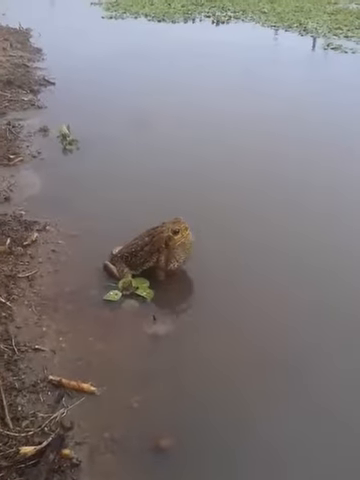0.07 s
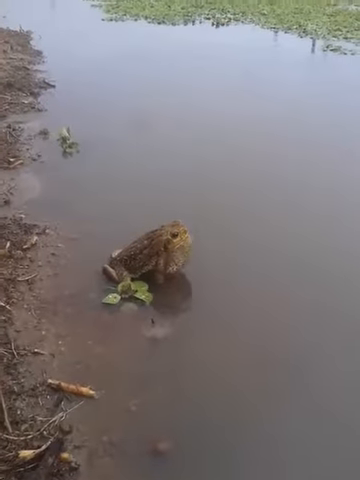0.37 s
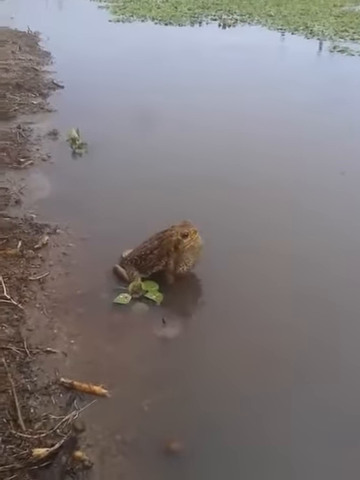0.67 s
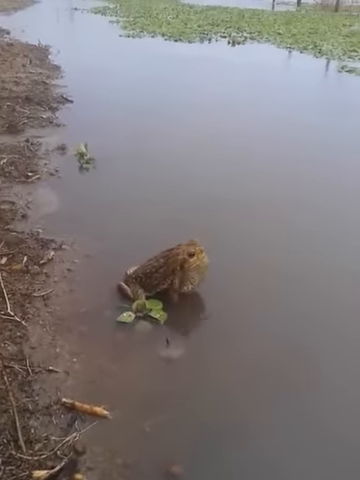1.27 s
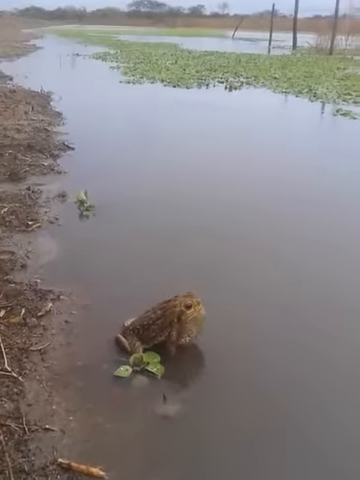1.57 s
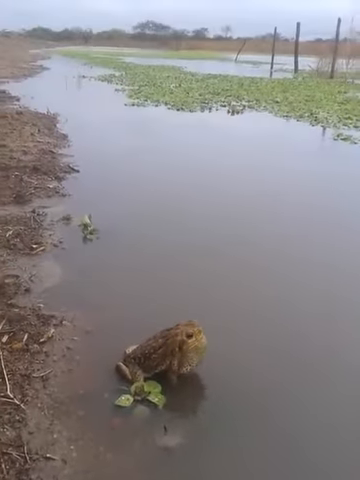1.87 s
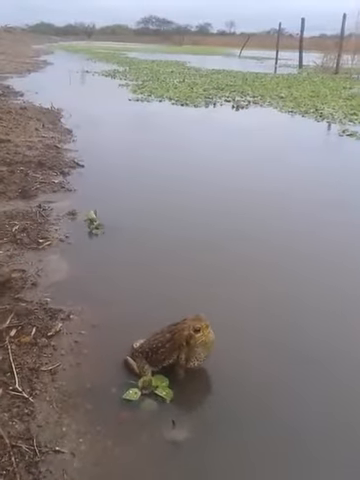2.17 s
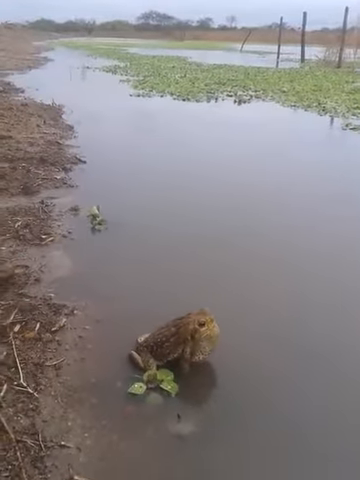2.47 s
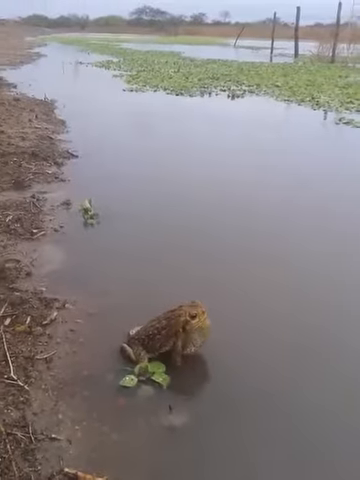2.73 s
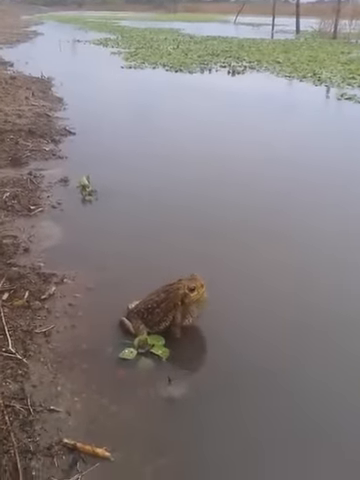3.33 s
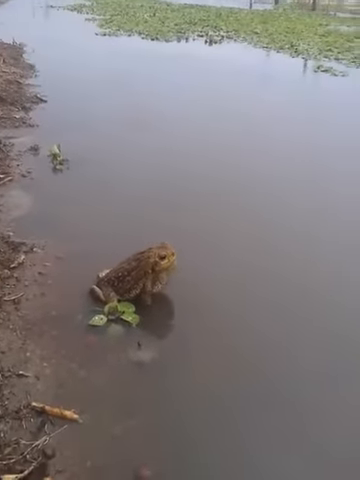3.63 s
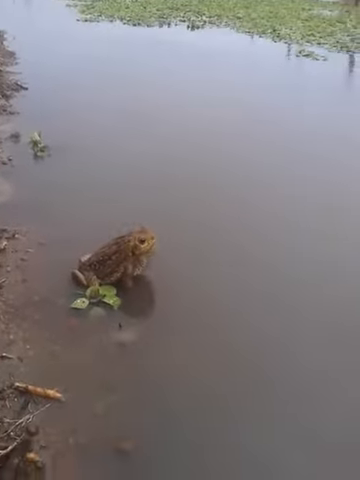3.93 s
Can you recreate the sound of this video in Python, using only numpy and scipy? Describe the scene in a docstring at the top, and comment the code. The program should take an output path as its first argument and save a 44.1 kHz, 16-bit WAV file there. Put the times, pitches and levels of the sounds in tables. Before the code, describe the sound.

At a pond's edge, a very close toad gives a low, rapidly pulsing, slightly distorted call. A quieter toad joins and carries on after it ends, with high frog trills, a few wet ticks and a distant chorus.

```python
"""A big toad at a pond's edge drums a low trill for three seconds, its vocal sac swelling several times
per pulse, so close that it overloads the microphone and rasps. A second toad answers farther off.
Two small frogs rattle high trills of chirped clicks, one fading early, one swelling at the end,
over a distant chorus, a thin insect tone and a few wet ticks."""
import sys
import numpy as np
from scipy import signal
from scipy.fft import rfft, irfft
from scipy.io import wavfile

SR = 44100
rng = np.random.default_rng(int(sys.argv[2]) if len(sys.argv) > 2 else 0)


def store_pcm(level_fs):
    """Save levels as 16-bit WAV."""
    pcm = np.round(np.clip(level_fs, -1, 1) * 32767).astype(np.int16)
    wavfile.write(sys.argv[1], SR, np.atleast_2d(pcm).T)


N = 176400
TIME_S = np.arange(N) / SR


def from_db(db):
    """Decibels to gain."""
    return 10 ** (np.asarray(db) / 20)


def unit_rms(x):
    """Scale to rms 1."""
    return x / np.sqrt(np.mean(x ** 2) + 1e-20)


def add(out, start_s, sound):
    """Mix a sound in at start_s."""
    i = int(round(start_s * SR))
    a, b = max(i, 0), min(i + len(sound), N)
    if b > a:
        out[a:b] += sound[a - i:b - i]


def ring(drive, hz, t60_s):
    """Resonator: a unit click starts a decaying sine of height 1."""
    r, w = from_db(-60 / (t60_s * SR)), 2 * np.pi * hz / SR
    return signal.lfilter([0, np.sin(w)], [1, -2 * r * np.cos(w), r * r], drive + 1e-18)


def bell(x, hz, db, q):
    """Lift or cut one band."""
    return x + (from_db(db) - 1) * signal.lfilter(*signal.iirpeak(hz, q, fs=SR), x)


def scatter(x, t60_s):
    """Diffuse reflections from banks and plants."""
    t = TIME_S[:SR // 2]
    tail = rng.standard_normal(len(t)) * from_db(-60 * t / t60_s)
    return signal.fftconvolve(x, tail / np.linalg.norm(tail))[:N]


def toad_pulse(at_s, hz, swells, lag_turns):
    """Sac tone sagging in pitch; each swell lags the last in phase. Returns start time and sound."""
    sag_hz, sag_at_s, sag_s = 32.8, .0228, .0018
    lift_hz, lift_s = 27.78, .0045
    t = np.arange(-.008, .08, 1 / SR)
    sag = sag_hz * (1 + np.tanh((t - sag_at_s) / sag_s)) / 2
    onset_lift = lift_hz * (1 - np.tanh(t / lift_s))
    pitch_hz = hz * (1 + .004 * rng.normal()) - sag + onset_lift
    turns = np.cumsum(pitch_hz) / SR + rng.random()
    stretch = 1 + .012 * rng.normal()
    sound = np.zeros(len(t))
    for k, (delay_s, rise_s, fall_s, squareness, db) in enumerate(swells):
        offset_s = t - delay_s * stretch
        envelope = np.exp(-np.abs(offset_s / np.where(offset_s < 0, rise_s, fall_s)) ** squareness)
        tone = np.sin(2 * np.pi * (turns - k * lag_turns))
        sound += from_db(db + .2 * rng.normal()) * envelope * tone
    return at_s + t[0], sound


# Trill pulses (time [s], level [dB])
NEAR_PULSES = [(-0.0135, 0.0), (0.0623, -1.9), (0.1385, -0.8), (0.2155, -0.2), (0.2899, -1.6),
               (0.3656, 0.3), (0.4423, -1.1), (0.5179, 1.4), (0.5927, -0.1), (0.6679, 1.8), (0.7435, -0.7),
               (0.8166, 0.7), (0.892, -1.2), (0.9683, 1.5), (1.0442, -1.4), (1.121, -0.6), (1.1981, 0.5),
               (1.2743, -1.4), (1.3532, 1.7), (1.4314, 0.4), (1.5126, -1.2), (1.5893, -1.1), (1.6665, -0.0),
               (1.7422, -1.8), (1.8176, 2.5), (1.8939, -0.1), (1.9714, 1.2), (2.0484, 2.3), (2.1256, 0.5),
               (2.2011, 0.2), (2.2772, -0.7), (2.3541, 0.1), (2.4313, -0.4), (2.5066, -1.1), (2.5817, 1.5),
               (2.6577, 0.2), (2.7344, 0.1), (2.8127, -1.2), (2.8893, -0.0), (2.9675, -0.7)]
# Sac swells per pulse (delay [s], rise [s], fall [s], squareness [-], level [dB])
NEAR_SWELLS = [(.0032, 0.0032, 0.0041, 3.29, 1.47), (.0133, 0.00447, 0.0061, 3.56, 3.5),
               (0.0232, 0.0022, 0.0076, 1.9, -1.5), (0.041, .004, 0.0035, 2.9, -28.5),
               (0.0483, .003, .003, 2.0, -31.5)]
# Body radiation, weak below the tone, strong above (frequency [Hz], gain [dB], Q [-])
BODY_BANDS = [(267, -9, 1.72), (850, 5, 10.04)]
# Throat overtones (frequency [Hz], level [dB], t60 [s])
THROAT_MODES = [(830, -41, .045), (1300, -50, .04), (1780, -39, .07), (3010, -47, .08), (3820, -50, .11),
                (5060, -60, .05)]
# Bank echoes (delay [s], level [dB])
BANK_ECHOES = [(.031, -49.5), (.056, -39.5)]


def near_toad():
    """Thirteen pulses a second; the sac's swells strike faint throat overtones, and the bank echoes."""
    voice, strikes, echoes = np.zeros((3, N))
    for at_s, db in NEAR_PULSES:
        start_s, pulse = toad_pulse(at_s, hz=467.5, swells=NEAR_SWELLS, lag_turns=.303)
        add(voice, start_s, from_db(db - .65) * pulse)
        for delay_s, *_, swell_db in NEAR_SWELLS:
            add(strikes, at_s + delay_s + .0003 * rng.normal(), from_db([db + swell_db]))
    for hz, db, q in BODY_BANDS:
        voice = bell(voice, hz, db, q)
    voice += sum(from_db(db) * ring(strikes, hz, t60_s) for hz, db, t60_s in THROAT_MODES)
    for delay_s, db in BANK_ECHOES:
        add(echoes, delay_s, from_db(db) * voice)
    return voice + echoes + from_db(-40.5) * scatter(voice, t60_s=.75)


# Chorus and air spectrum (frequency [Hz], relative density [dB])
CHORUS_SPECTRUM = [(40, -51), (120, -20.5), (250, -16.5), (430, 12.5), (650, -7), (900, 0), (1400, -18.5),
                   (2100, -7.5), (2600, -9), (3050, 3.5), (3500, -9), (4500, -10.5), (5800, -13.5),
                   (6700, -26), (8000, -34), (10000, -37.5), (16000, -40)]


def chorus():
    """Distant chorus and air as steady shaped noise."""
    hz, db = np.transpose(CHORUS_SPECTRUM)
    bins_hz = np.maximum(np.arange(N // 2 + 1) * SR / N, 1)
    gain = from_db(np.interp(np.log(bins_hz), np.log(hz), db))
    noise = irfft(rfft(rng.standard_normal(N)) * gain, N)
    return from_db(-42.5) * unit_rms(noise)


def insect(hz=7190, width_hz=35):
    """One thin tone: noise through a narrow resonance, twice."""
    t60_s = np.log(1000) / np.pi / width_hz
    band = ring(rng.standard_normal(N), hz, t60_s)
    return from_db(-63.5) * unit_rms(ring(band, hz, t60_s))


# Contour of the early trill (time [s], level [dB])
FADING_TRILL = [(0, -36), (.6, -35.5), (1.15, -37.5), (1.33, -41.5), (1.4, -54)]
# Contour of the late, nearer trill (time [s], level [dB])
SWELLING_TRILL = [(3.05, -36), (3.15, -28), (3.28, -22.5), (3.5, -19), (3.7, -19), (4.0, -20)]
# Clicks per note (delay [s], level [dB])
CLICKS = [(0, 0), (.00519, -1), (.01038, -9), (.0156, -20), (.0242, -16)]


def frog_trill(contour, first_s, period_s, hz, wet_db, jitter_s):
    """A rattle of notes, each a few clicks chirping down onto the sac's pitch; softer notes are lower."""
    rise_s, decay_s = .001, .0019
    chirp_hz, chirp_s, slack_hz_per_db = 950, .0015, 14.5
    out, t = np.zeros(N), TIME_S[:SR // 60]
    envelope = (1 - np.exp(-(t / rise_s) ** 2)) * np.exp(-t / decay_s)
    envelope /= envelope.max()
    turns = np.cumsum(hz + chirp_hz * np.exp(-t / chirp_s)) / SR
    times_s, levels_db = np.transpose(contour)
    for at_s in np.arange(first_s, times_s[-1], period_s):
        note_db = np.interp(at_s, times_s, levels_db) + .78 * rng.normal()
        note_s = at_s + .0003 * rng.normal()
        slack_hz = slack_hz_per_db * (levels_db.max() - note_db)
        for delay_s, db in CLICKS:
            detune = 1 + .0079 * rng.normal()
            click = envelope * np.sin(2 * np.pi * (turns - slack_hz * t) * detune)
            click_s = note_s + delay_s + jitter_s * rng.normal()
            add(out, click_s, from_db(note_db + db + rng.normal()) * click)
    return out + from_db(wet_db) * scatter(out, t60_s=.068)


# Wet ticks (time [s], level [dB], crack frequency [Hz])
WET_TICKS = [(.1175, -23.5, 5200), (0.2102, -21.5, 5600), (0.5165, -25, 5000), (1.544, -25, 5600),
             (1.7137, -26.5, 5000), (2.339, -17.5, 3800), (2.3865, -24, 5000), (2.575, -22.5, 5800),
             (3.473, -21.5, 5200), (3.5318, -25.5, 5400), (3.656, -29, 5400), (3.7018, -29.5, 5400),
             (3.780, -30, 6000), (3.793, -3, 4900), (3.808, -35, 6200), (3.825, -16, 4300)]


def wet_ticks():
    """Tiny wet snaps: a bright crack, a brief lower knock and a burst of noise."""
    decay_s, knock_s, knock_hz, low_cut_hz = .00033, .00039, 1610, 720
    out, t = np.zeros(N), TIME_S[:SR // 100]
    crack_envelope = 2 * t / decay_s * np.exp(1 - 2 * t / decay_s)
    knock = from_db(-5.5) * np.exp(-t / knock_s) * np.sin(2 * np.pi * knock_hz * t)
    for at_s, db, hz in WET_TICKS:
        crack = crack_envelope * np.sin(2 * np.pi * hz * t)
        burst = from_db(-17.5) * np.exp(-t / decay_s) * rng.standard_normal(len(t))
        add(out, at_s, from_db(db) * (crack + knock + burst))
    out = signal.sosfilt(signal.butter(2, low_cut_hz, "high", fs=SR, output="sos"), out)
    return out + from_db(-17.5) * scatter(out, t60_s=.12)


# Contour of the answering trill (time [s], level [dB])
FAR_CONTOUR = [(2.2, -24.5), (2.4, -15.5), (2.8, -14), (3.1, -15), (3.5, -14.5), (3.7, -16.5), (4.0, -17)]
# Sac swells per pulse (delay [s], rise [s], fall [s], squareness [-], level [dB])
FAR_SWELLS = [(.004, 0.0024, 0.0046, 2.7, -10), (.0145, 0.0075, 0.0047, 2.3, -6),
              (.026, .005, .007, 2.0, -7), (.055, 0.0089, .008, 1.7, -41.5)]


def far_toad(first_s=2.248, period_s=.0703):
    """A slightly lower, quicker trill from farther along the bank."""
    out = np.zeros(N)
    for at_s in np.arange(first_s, TIME_S[-1], period_s):
        start_s, pulse = toad_pulse(at_s, hz=452.7, swells=FAR_SWELLS, lag_turns=.15)
        db = np.interp(at_s, *np.transpose(FAR_CONTOUR))
        add(out, start_s, from_db(db) * pulse)
    return out


def scene():
    """Everything at the water's edge, mono."""
    frogs = frog_trill(SWELLING_TRILL, first_s=3.0538, period_s=.0294, hz=2530, wet_db=-7, jitter_s=2e-5)
    frogs += frog_trill(FADING_TRILL, first_s=.0043, period_s=.028, hz=2234, wet_db=10, jitter_s=1e-4)
    return (near_toad() + far_toad() + frogs + wet_ticks() + insect() + chorus())[None]


# Colour of the overload's rasp (frequency [Hz], gain [dB], Q [-])
RASP_BANDS = [(1426, -8.5, 4.6), (2220, 5.5, 4.5), (3910, 2.5, 3.7), (5650, 3, 3.4)]


def record(dry):
    """The overloaded input flattens the peaks, giving the toad its rasp; the top is cut."""
    ceiling, knee, bias, cutoff_hz = .63, 37, .006, 17500
    biased = dry + bias
    clipped = biased / (1 + np.abs(biased / ceiling) ** knee) ** (1 / knee)
    rasp = clipped - biased
    for hz, db, q in RASP_BANDS:
        rasp = bell(rasp, hz, db, q)
    return signal.sosfilt(signal.cheby2(12, 70, cutoff_hz, fs=SR, output="sos"), dry + rasp)


dry = scene()
out = record(dry)
store_pcm(out)
```